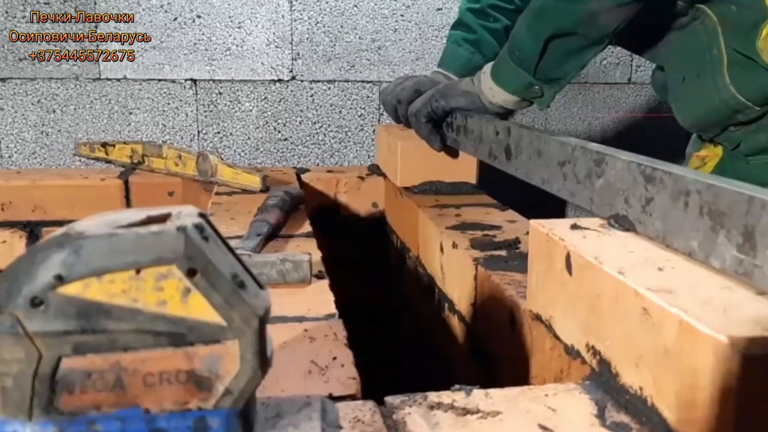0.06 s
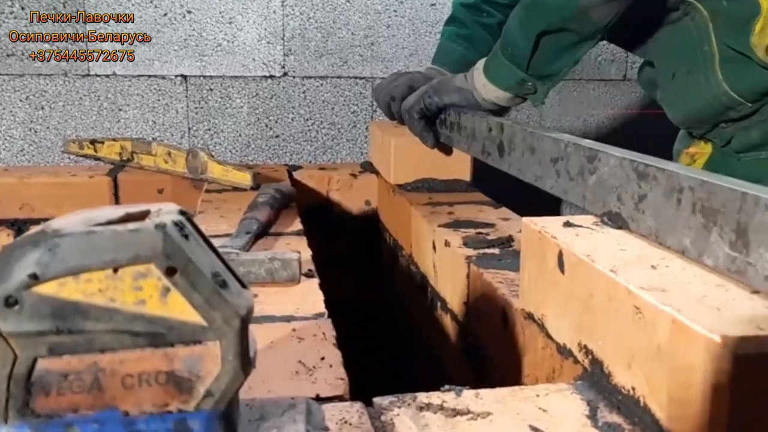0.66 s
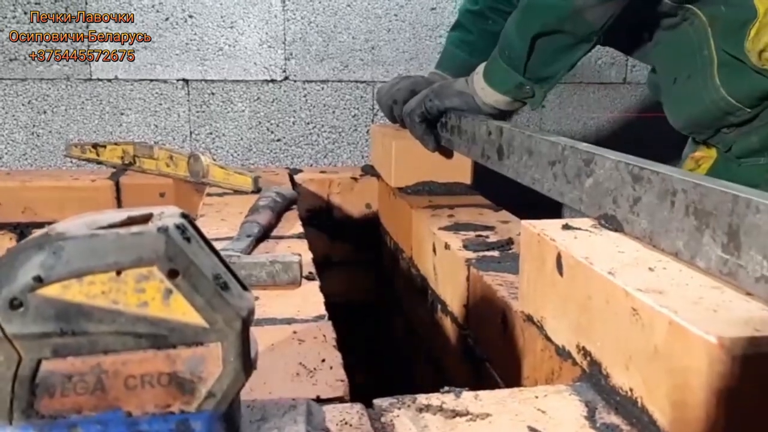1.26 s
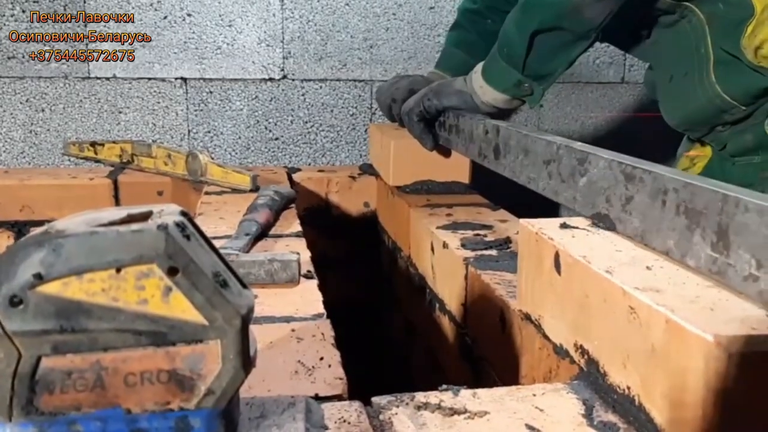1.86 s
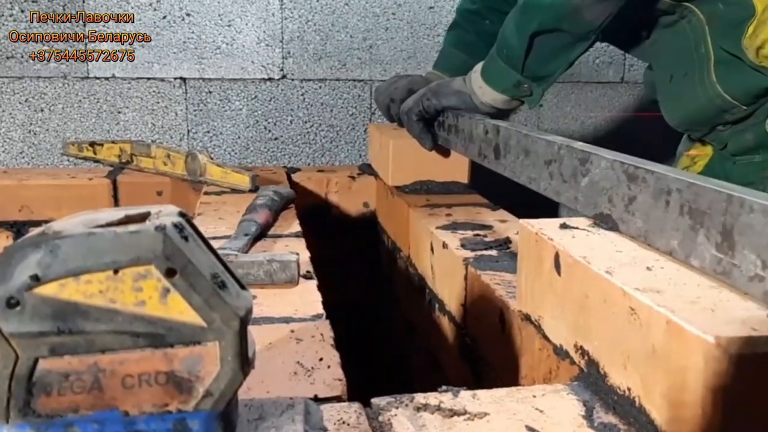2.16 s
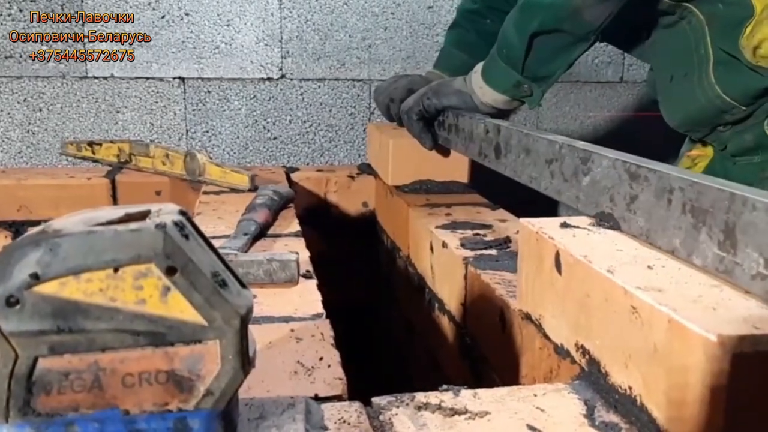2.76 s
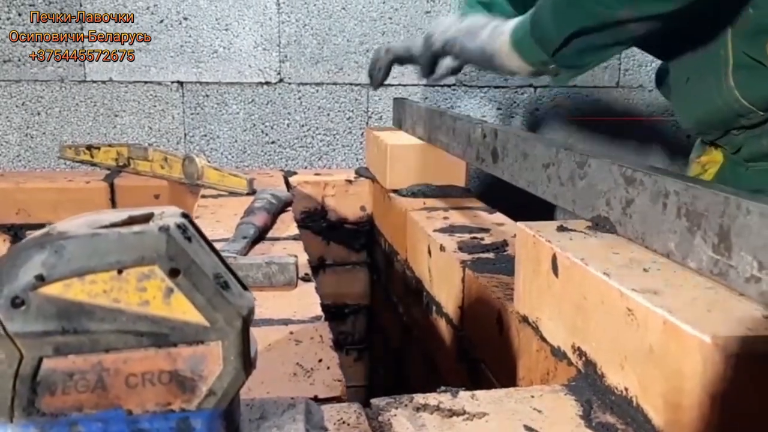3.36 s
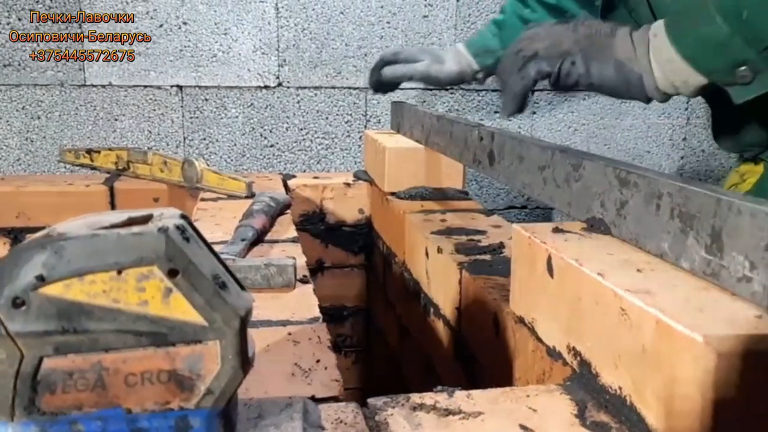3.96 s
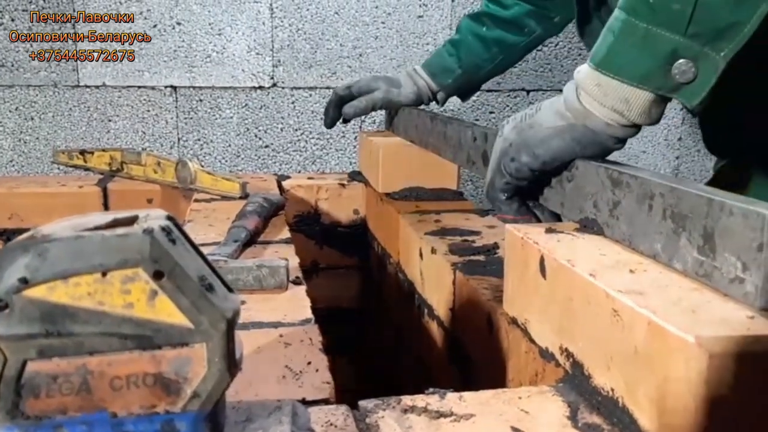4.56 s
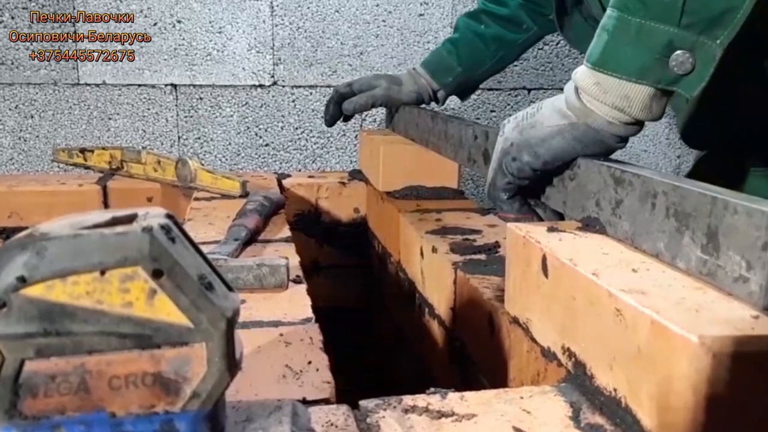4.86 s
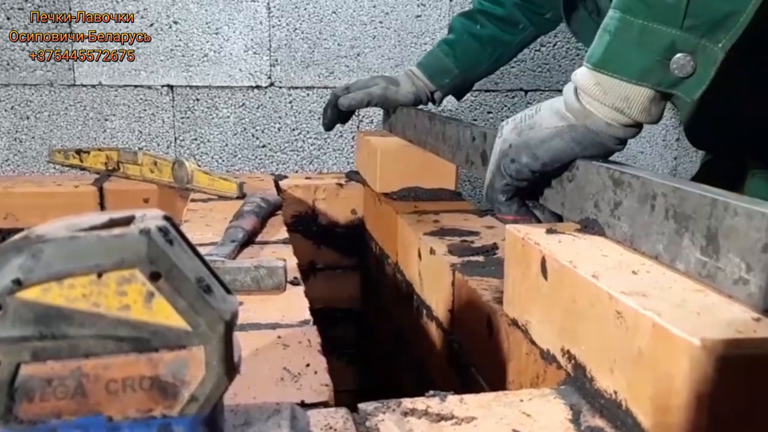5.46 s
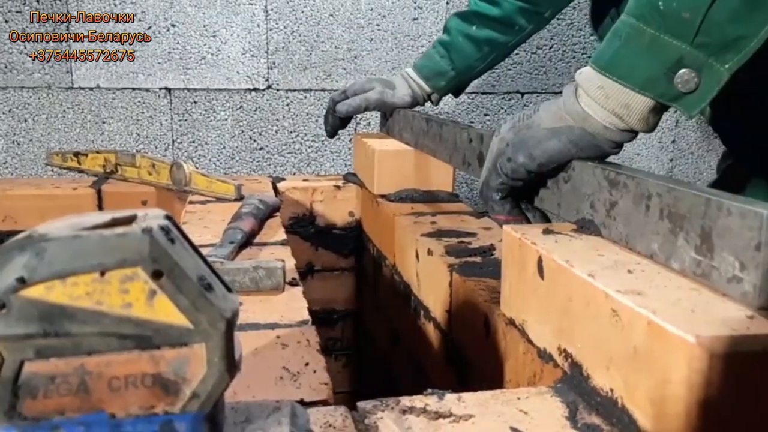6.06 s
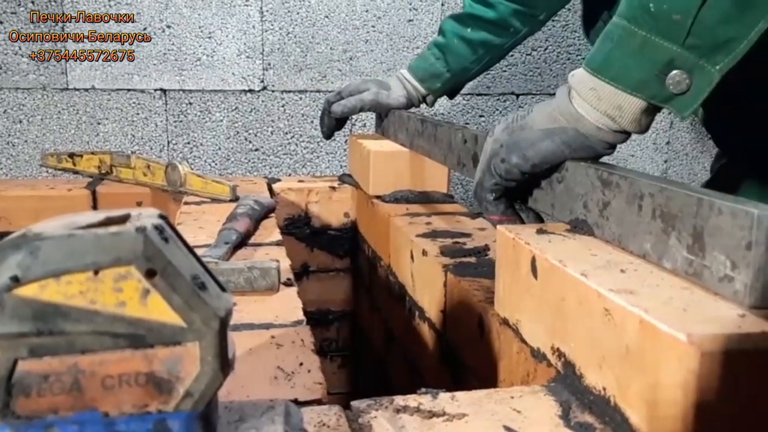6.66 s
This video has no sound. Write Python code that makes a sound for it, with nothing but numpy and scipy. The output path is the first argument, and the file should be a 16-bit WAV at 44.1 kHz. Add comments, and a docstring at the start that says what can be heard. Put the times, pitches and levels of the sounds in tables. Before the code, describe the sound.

A hollow metal straightedge is nudged against brick, making short gritty scrapes and sharp taps with a brief metallic ring. The contacts come in uneven clusters, then ease off while sleeves rustle and a glove rubs softly. Near the end the bar is set down twice with hollow clacks. The work sounds close and toward the left, with a short reflection from block walls over a faint dull rumble.

```python
"""Straightedge on a brick course

A bricklayer nudges a brick into line with a hollow metal straightedge. The bar grates on the fired clay
by stick-slip friction and knocks as it rocks; near the end he sets it down twice. Each contact excites
its modes. Gloves and sleeves rustle, and bare block walls return a short tail over a dull rumble."""
import sys
import numpy as np
from scipy import signal
from scipy.fft import rfft, irfft
from scipy.io import wavfile
from scipy.ndimage import uniform_filter1d

SR = 44100
rng = np.random.default_rng(int(sys.argv[2]) if len(sys.argv) > 2 else 0)


def dump(signal):
    """Clip the signal to [-1, 1] and save it as 16-bit WAV at the path in sys.argv[1]."""
    limited = np.clip(np.atleast_2d(signal).T, -1, 1)
    pcm = np.round(limited * 32767).astype(np.int16)
    wavfile.write(sys.argv[1], SR, pcm)


N = 295911

# Background spectrum. Each row: frequency in Hz, relative level in dB.
AIR_SPECTRUM = [(15, -44.5), (25, -53), (49, 1), (79, -12.5), (107, -1), (198, -4), (227, 0), (260, -9),
                (289, -4), (322, -6), (421, -11.5), (552, -13.5), (684, -12.5), (848, -21), (1110, -16.5),
                (1300, -9.5), (1450, -14), (2120, -16.5), (2300, -19.5), (3530, -23), (5430, -37),
                (8000, -44), (10900, -38), (15500, -38.5)]
# Slow drift of the background. Each row: time in seconds, relative level in dB.
AIR_DRIFT = [(0.0, -53), (0.54, -52.5), (1.87, -52), (5.24, -52), (5.37, -54.5), (6.7, -53)]
# Likeness of the background's two channels. Each row: frequency in Hz, correlation.
AIR_COHERENCE = [(60, 0.89), (130, 1), (290, 0.92), (640, 0.2), (1410, 0.024), (3100, 0.014), (6820, 0.076),
                 (15000, -0.027)]
# Stereo balance of background and work. Each row: frequency in Hz, left minus right in dB.
AIR_BALANCE = [(60, 0), (110, 1.5), (200, 1), (380, 5.5), (700, 5.5), (1290, 12), (2380, 12), (4400, 12.5),
               (8120, 1), (15000, 0)]
WORK_BALANCE = [(60, 18.5), (300, 7), (900, 7.5), (1550, 16.5), (2300, 5.5), (4000, 7.5), (5300, -1),
                (6600, 7), (7400, -1), (10500, 3), (12200, 6), (15000, 6)]
# Phase difference of the work's sound. Each row: frequency in Hz, lead of the left in radians.
WORK_LEAD = [(60, 0.5), (800, 0.84), (1500, 0.84), (2300, -3), (3800, -2.5), (6300, -5.5), (9000, -7.5),
             (12000, -6), (15000, -11)]
# Faint background tones. Each row: frequency in Hz, rms level in dB.
HUM_TONES = [(226.1, -67), (511.4, -75), (635.2, -74), (1136, -70.5), (1281, -75)]
# Modes of the bar. Each row: frequency in Hz, relative level in dB.
BAR_MODES = [(1940, 9.5), (2025, 1), (2150, -20), (2390, -14.5), (2545, 3.5), (2700, -14), (3100, -4.5),
             (3405, 2), (3520, -7.5), (4000, 5), (4220, 7.5), (4365, -14), (4680, -21), (5060, 8.5),
             (5410, -2.5), (6040, -7), (6320, -14), (6492, -13), (6758, -2), (7020, -17.5)]
# The hands damp high modes most. Each row: frequency in Hz, time to fall 60 dB in seconds.
BAR_T60 = [(1900, .11), (3000, .085), (7000, .065)]
# Spectra of grating sand, an edge tap, a flat landing, a sleeve and a rubbing glove.
# Each row: frequency in Hz, relative level in dB.
GRIT_SPECTRUM = [(100, -28), (500, -22), (950, -21.5), (1600, -14), (1950, -3.5), (2700, 0), (4400, -1.5),
                 (5600, -6), (6200, 3), (7000, -2), (7900, -12.5), (11000, -15), (13300, -10.5),
                 (16000, -22.5)]
TAP_SPECTRUM = [(100, -32), (450, -17.5), (900, -18), (1500, -13), (1950, -7), (2600, 4), (4000, -6),
                (5100, -3.5), (5600, -15), (6100, -0.5), (7000, -3.5), (7800, -16), (11000, -23),
                (13600, -13), (16000, -33)]
DROP_SPECTRUM = [(100, -48.5), (450, -16), (900, -14.5), (1500, -11), (1950, 1.5), (2600, 5.5), (4000, -4),
                 (5100, -1.5), (5600, -11.5), (6100, -1.5), (7000, -5.5), (7800, -16.5), (11000, -23.5),
                 (13600, -16.5), (16000, -34)]
SLEEVE_SPECTRUM = [(200, -9), (900, -6.5), (1500, -5.5), (4000, -4), (5600, -9), (6800, -6), (7800, -16),
                   (11000, -21), (13700, -17), (16000, -22.5)]
GLOVE_SPECTRUM = [(1500, -24.5), (3200, -7), (4000, 1), (4400, -13.5), (5200, -6), (5900, -21), (6650, -3),
                  (7300, -32), (16000, -18.5)]
# Shoves along the brick. Each row: moment of slip in seconds, grating level in dB,
# creep before in seconds, slide after in seconds, relative ring of the bar in dB.
SHOVES = [(0.0245, -32.5, 0.00088, 0.035, -4.5), (.062, -26, 0.0098, 0.038, -2),
          (0.352, -37, 0.0012, 0.021, 3), (1.752, -24.5, 0.029, 0.037, 2.5),
          (1.835, -26.5, 0.042, 0.025, -2.5), (1.871, -26.5, 0.0057, 0.02, -2.5),
          (2.038, -40, .01, 0.062, 2), (2.208, -36.5, .055, 0.01, 4), (2.267, -33.5, 0.0096, 0.047, -0.5),
          (2.386, -22.5, 0.016, 0.033, 5.5), (2.5336, -32, .048, 0.015, -10),
          (2.639, -29, 0.026, .024, -1.5), (4.562, -44, 0.0052, 0.043, -6),
          (5.031, -47.5, 0.043, 0.0187, 1), (5.1954, -36, 0.026, 0.0068, -6)]
# Taps of the bar's edge. Each row: start in seconds, energy in dB, tilt in dB per octave.
KNOCKS = [(.085, -11.5, -5.5), (.656, -16, -1.5), (.696, -18.5, 0), (.758, -7, .5), (0.7802, 3, 1),
          (0.7867, 6.5, .5), (0.807, -8, -3.5), (0.936, -20, 1), (1.414, -5.5, -1.5), (1.7695, -0.5, 3),
          (1.979, -14.5, -1.5), (2.3927, -4, 10), (2.506, -12, -3), (2.620, -14, -4), (3.253, -20, -9),
          (4.620, -22.5, 2), (4.833, -18, 1), (4.946, -16, -1.5), (5.180, -15.5, 1.5)]
# Glove and arm movements. Each row: peak time in seconds, peak rms in dB, rise and fall in seconds.
GLOVE_RUBS = [(.86, -61.5, 0.14, 3.3), (2.3, -61, 0.5, 1.5), (4.4, -59, 1.24, 0.96)]
ARM_REACHES = [(3.21, -49.5, .27, .15), (4.22, -55, 0.12, .2), (4.34, -51, 0.17, 0.19),
               (4.63, -57, 0.17, 0.3), (5.02, -56.5, 0.59, 0.62)]
# Flat landings. Each row: start in seconds, energy in dB, tilt in dB per octave, relative ring in dB.
DROPS = [(5.045, 9, 1.5, -5), (6.217, 4.5, 0, -15)]
# Reverberation time. Each row: frequency in Hz, time to fall 60 dB in seconds.
ROOM_T60 = [(200, 0.59), (2000, 0.26), (6500, 0.28), (14000, 0.31)]
# Starting spectrum of the reverberation. Each row: frequency in Hz, relative level in dB.
ROOM_SPECTRUM = [(300, 5), (1400, 3.5), (2250, 0), (4000, -5), (6600, -1.5), (9000, 1.5), (14000, -0.5)]


def amp(db):
    return 10 ** (np.asarray(db) / 20)


def unit_rms(x):
    return x / np.sqrt(np.mean(x ** 2) + 1e-20)


def unit_energy(x):
    return x / np.sqrt(np.mean(np.sum(x ** 2, axis=-1)) + 1e-20)


def at_hz(table, hz):
    f, value = np.transpose(table)
    return np.interp(np.log(hz + 1), np.log(f + 1), value)


def add(mix, start_s, sound):
    part = mix[:, max(round(start_s * SR), 0):][:, :sound.shape[1]]
    part += sound[:, :part.shape[1]]


def bins(size):
    return np.fft.rfftfreq(size, 1 / SR)


def pan(db):
    """Constant-power law: left and right gains for a level difference."""
    pair = amp(np.array([db, -db]) / 2)
    return pair / np.sqrt(np.mean(pair ** 2, axis=0))


def minimum_phase(db):
    """Folding the cepstrum gives the spectrum of the most compact causal pulse with these levels."""
    cepstrum = irfft(np.log(amp(db)))
    half = len(cepstrum) // 2
    cepstrum[1:half] *= 2
    cepstrum[half + 1:] = 0
    return np.exp(rfft(cepstrum))


def from_work(spectrum, size):
    """Two-path propagation: the work's sound reaches each channel with its own level and phase."""
    hz = bins(size)
    phase = np.exp(.5j * np.array([[1], [-1]]) * at_hz(WORK_LEAD, hz))
    return irfft(spectrum * pan(at_hz(WORK_BALANCE, hz)) * phase, size)


def background(gain_db=1.5, flicker_db=1.46):
    """Coherence falls with frequency: distant rumble is alike on both sides, diffuse hiss is not."""
    hz = bins(2048)
    a, b, c, d, flicker = rng.standard_normal((5, N // 512 + 5, len(hz)))
    coherence = at_hz(AIR_COHERENCE, hz)
    left = a + 1j * b
    right = coherence * left + np.sqrt(1 - coherence ** 2) * (c + 1j * d)
    flicker = uniform_filter1d(flicker, size=10, axis=0)
    flicker = unit_rms(uniform_filter1d(flicker, size=6, axis=1))
    frames = np.array([left, right]) * amp(at_hz(AIR_SPECTRUM, hz) + flicker_db * flicker)
    frames *= pan(at_hz(AIR_BALANCE, hz))[:, None]
    sound = signal.istft(frames.transpose(0, 2, 1), nperseg=2048, noverlap=1536)[1][:, :N]
    drift_db = np.interp(np.arange(N) / SR, *np.transpose(AIR_DRIFT))
    return unit_rms(sound) * amp(gain_db + drift_db)


def hum(width_hz=13.0):
    """Narrow-band noise is heard as a wavering tone; a few sound faintly, far away."""
    out = np.zeros((2, N))
    for f, db in HUM_TONES:
        band = np.exp(-.5 * ((bins(N) - f) / (width_hz / 2)) ** 2)
        tone = irfft(rfft(rng.standard_normal(N)) * band, N)
        out += amp(db) * unit_rms(tone) * pan(at_hz(AIR_BALANCE, f))[:, None]
    return out


def bar_ring(t, tilt_db, uneven_db):
    """Modal superposition: the place of contact sets how strongly each damped mode answers."""
    f, db = np.transpose(BAR_MODES)[:, :, None]
    level_db = db + tilt_db * np.log2(f / f[0]) - 60 * t / at_hz(BAR_T60, f)
    modes = amp(level_db) * np.sin(2 * np.pi * f * t)
    weights = rng.choice([-1, 1], len(f)) * amp(uneven_db * rng.standard_normal((2, len(f))))
    return unit_energy(weights @ modes)


def contact(spectrum, tilt_db, ring_db, clatter_db, clatter_t60, width, ring_tilt_db=0, uneven_db=2.5):
    """Impulse response of bar on brick: a crack, a short dense clatter and the bar's ring."""
    size = 16384
    t, hz = np.arange(size) / SR, bins(size)
    slope_db = tilt_db * np.log2(np.maximum(hz, 500) / 3500)
    crack = minimum_phase(at_hz(spectrum, hz) + slope_db)
    crack /= np.linalg.norm(irfft(crack))
    noise = rng.standard_normal((3, size))
    clatter = unit_energy((noise[0] + width * noise[1:]) * amp(-60 * t / clatter_t60))
    ring = rfft(bar_ring(t, ring_tilt_db, uneven_db)) * amp(slope_db)
    response = crack * (1 + amp(clatter_db) * rfft(clatter)) + amp(ring_db) * ring
    travel_s = 16 / SR + 2e-5 * rng.standard_normal((2, 1))  # varies with the place of contact
    response *= np.exp(-2j * np.pi * hz * travel_s)
    return unit_energy(from_work(response, size)[:, :size // 2])


def tap(db, tilt_db, ring_db):
    """Impact of the bar's edge: a crack with a gritty clatter, slightly crisper on hard blows."""
    clatter_db = 3 - .1 * db
    return amp(db) * contact(TAP_SPECTRUM, tilt_db, ring_db, clatter_db, clatter_t60=.045, width=.8)


def sand_grains(size, per_s=1500, spread_db=6.0):
    """Shot noise: grains under the bar give impulses of random time, strength and sign."""
    chance, quantile = rng.random((2, size))
    strength = amp(spread_db * np.minimum(-np.log(1 - quantile), 3.2))
    return (chance < per_s / SR) * strength * rng.choice([-1, 1], size)


def scrapes(edge_s=0.0031, crack_db=22, strain_db_per_s=70):
    """Stick-slip friction: the bar creeps, cracks loose (harder the longer it stuck) and slides."""
    out = np.zeros((2, N))
    for slip_s, db, creep_s, slide_s, ring_db in SHOVES:
        t = np.arange(SR // 8) / SR - creep_s
        swell_db = -2 - 8.5 * np.minimum(abs(t) / creep_s, 1) ** 0.83
        effort_db = np.where(t < 0, swell_db, -4.5 * t / slide_s)
        opening = (t + creep_s) / (edge_s + creep_s / 4)
        gate = np.clip(np.minimum(opening, (slide_s - t) / edge_s), 0, 1)
        pressure = np.sqrt(np.mean(gate ** 2) / 2) * amp(db + effort_db)
        for _ in range(2):  # the bar bears on two spots of the brick
            force = unit_rms(sand_grains(len(t)) * gate) * pressure
            response = contact(GRIT_SPECTRUM, tilt_db=-1.18, ring_db=ring_db, clatter_db=3.0,
                               clatter_t60=0.038, width=1.0, ring_tilt_db=-5.5, uneven_db=6.5)
            add(out, slip_s - creep_s, signal.fftconvolve(force[None], response, axes=1))
        add(out, slip_s, tap(db + crack_db + strain_db_per_s * creep_s, tilt_db=0, ring_db=ring_db + 4))
    return out


def knocks(ring_db=-4, press_damping=.3):
    """Contact damping: the rocking bar taps the course, and harder taps have a smaller share of ring."""
    out = np.zeros((2, N))
    for start_s, db, tilt_db in KNOCKS:
        add(out, start_s, tap(db, tilt_db, ring_db - press_damping * db))
    return out


def friction_noise(noise, spectrum, movements, fade_db=26.5):
    """Incoherent sources add in power: coloured noise swells and fades with each movement."""
    t = np.arange(N) / SR
    sound = from_work(rfft(noise) * amp(at_hz(spectrum, bins(N))), N)
    swells = [amp(db - fade_db * np.maximum((peak_s - t) / rise_s, (t - peak_s) / fall_s))
              for peak_s, db, rise_s, fall_s in movements]
    return unit_rms(sound) * np.linalg.norm(swells, axis=0)


def gloves():
    """Sliding friction under steady pressure: a glove hisses softly along the bar."""
    return friction_noise(rng.standard_normal((2, N)), GLOVE_SPECTRUM, GLOVE_RUBS)


def sleeves(grain_db=2.0, clump_db=0.9):
    """Amplitude modulation: catching fibres roughen noise into a fine rustle as an arm moves."""
    grains, clumps = (unit_rms(uniform_filter1d(rng.standard_normal(N), size)) for size in (60, 700))
    fibres = rng.standard_normal((2, N)) * amp(grain_db * grains + clump_db * clumps)
    return friction_noise(fibres, SLEEVE_SPECTRUM, ARM_REACHES)


def drops():
    """Distributed impact: the whole edge lands at once, a hollow clack that favours the low modes."""
    out = np.zeros((2, N))
    for start_s, db, tilt_db, ring_db in DROPS:
        clack = contact(DROP_SPECTRUM, tilt_db, ring_db, clatter_db=1.5, clatter_t60=.04,
                        width=.7, ring_tilt_db=-1.5)
        add(out, start_s, amp(db) * clack)
    return out


def room(direct, wet_db=-8.0, build_s=0.0017, turn_s=0.904):
    """Diffuse reflection from block walls: three noise tails crossfade steadily, so no pitch rings out."""
    out = direct.copy()
    for k in range(3):
        hz, t, frames = signal.stft(rng.standard_normal((2, SR * 2 // 3)), SR, nperseg=256)
        level_db = at_hz(ROOM_SPECTRUM, hz)[:, None] - 60 * t / at_hz(ROOM_T60, hz)[:, None]
        tail = signal.istft(frames * amp(level_db) * (1 - np.exp(-t / build_s)), SR, nperseg=256)[1]
        share = np.sqrt(2 / 3) * np.cos(np.pi * (np.arange(N) / SR / turn_s + k / 3))
        out += amp(wet_db) * signal.fftconvolve(direct * share, unit_energy(tail), axes=1)[:, :N]
    return out


def scene():
    """Superposition of the background, the bar's contacts in the room and the cloth."""
    return background() + hum() + room(scrapes() + knocks() + drops()) + gloves() + sleeves()


def record(dry, low_hz=45, high_hz=15650):
    """Band limiting: a low cut, clipping at full scale, then a steep low-pass."""
    cut = signal.sosfilt(signal.butter(2, low_hz, "highpass", fs=SR, output="sos"), dry)
    low_pass = signal.firwin(401, high_hz, window=("kaiser", 8), fs=SR)
    return signal.oaconvolve(np.clip(cut, -1, 1), low_pass[None], "same")


dry = scene()
out = record(dry)
dump(out)
```